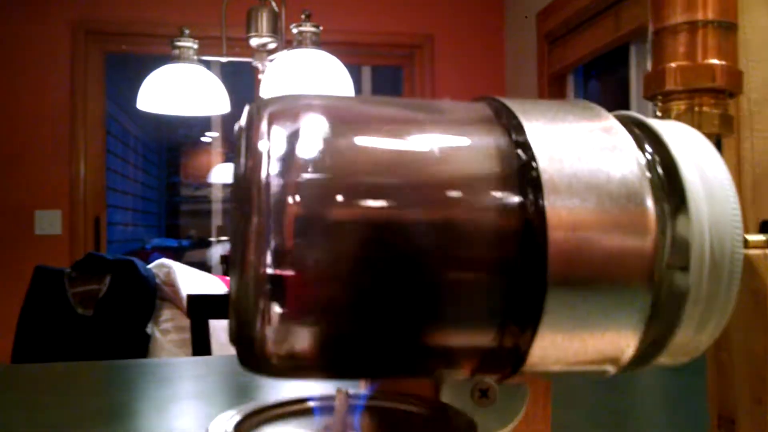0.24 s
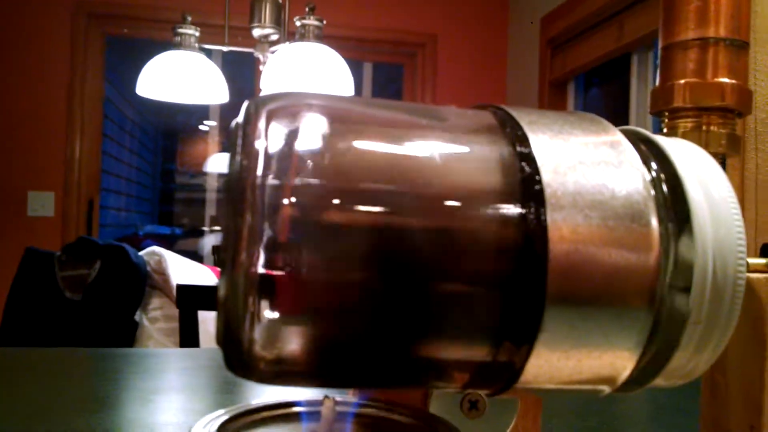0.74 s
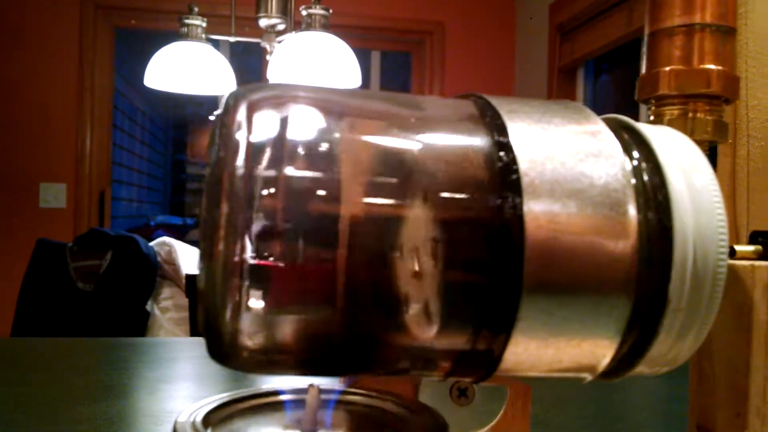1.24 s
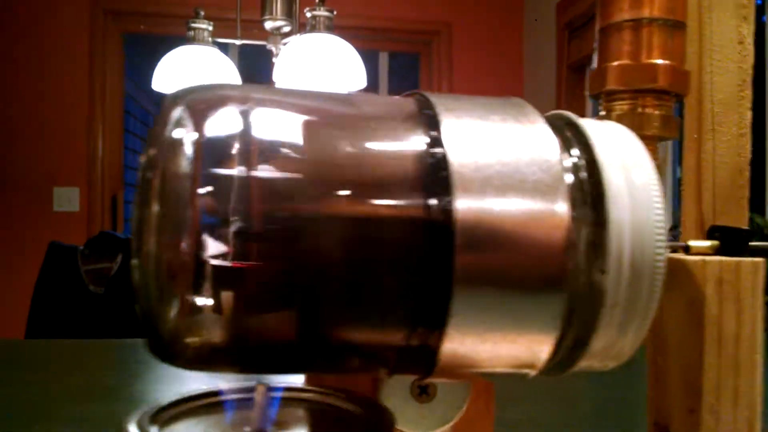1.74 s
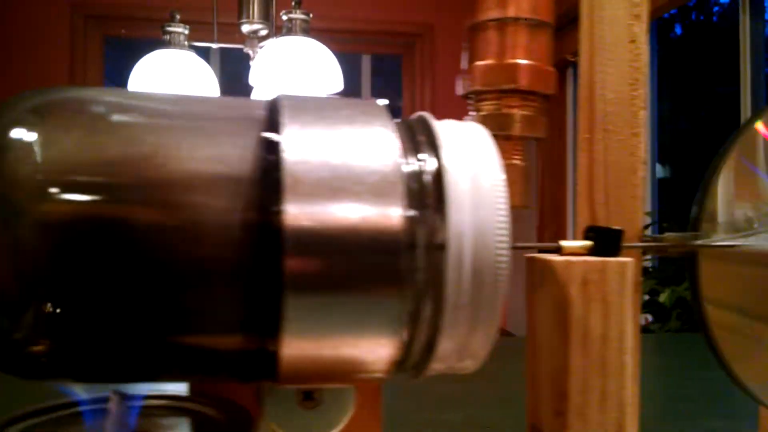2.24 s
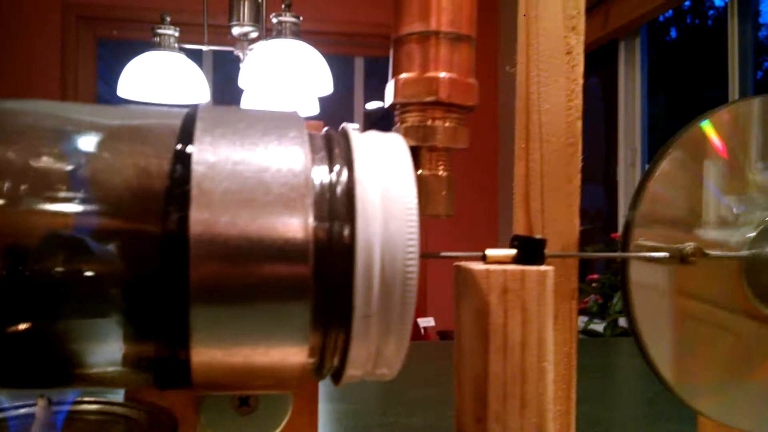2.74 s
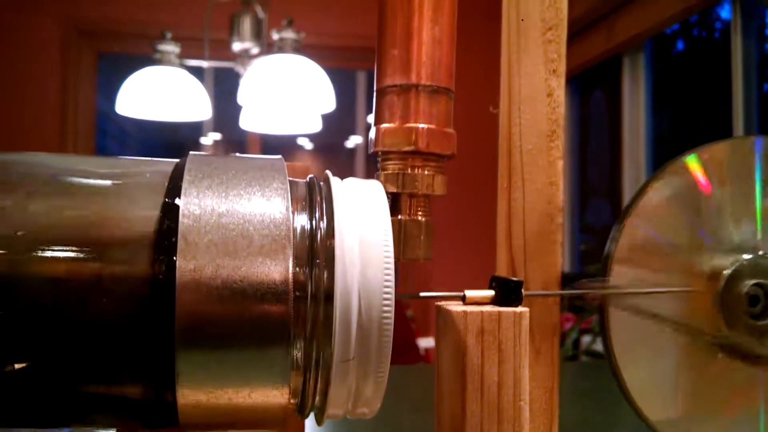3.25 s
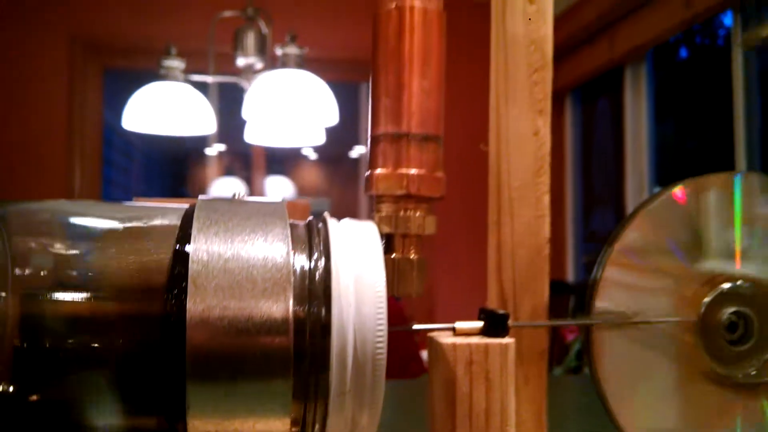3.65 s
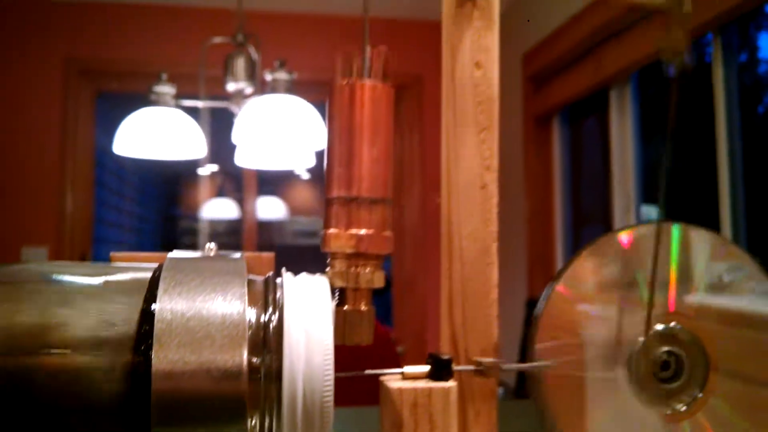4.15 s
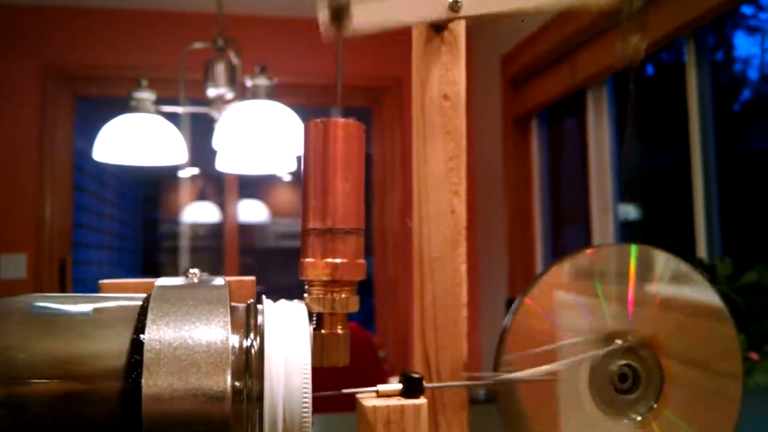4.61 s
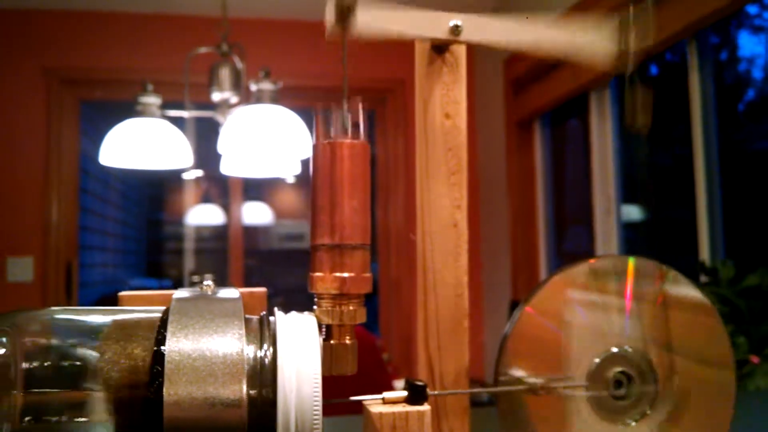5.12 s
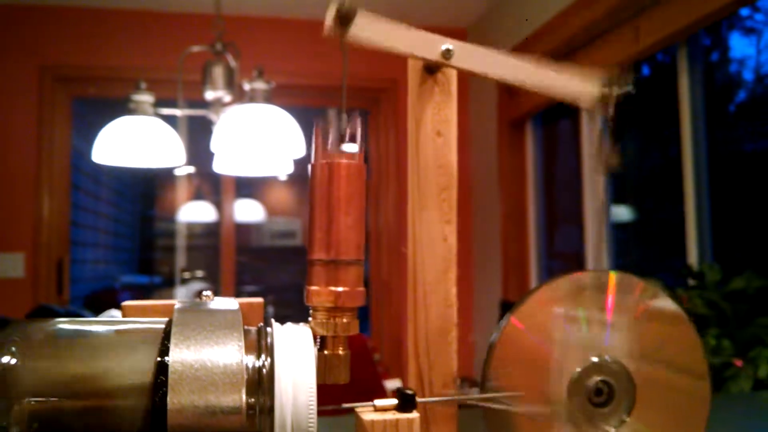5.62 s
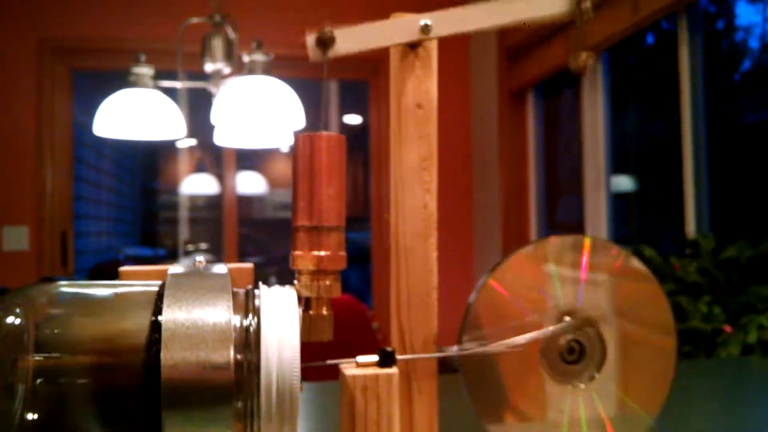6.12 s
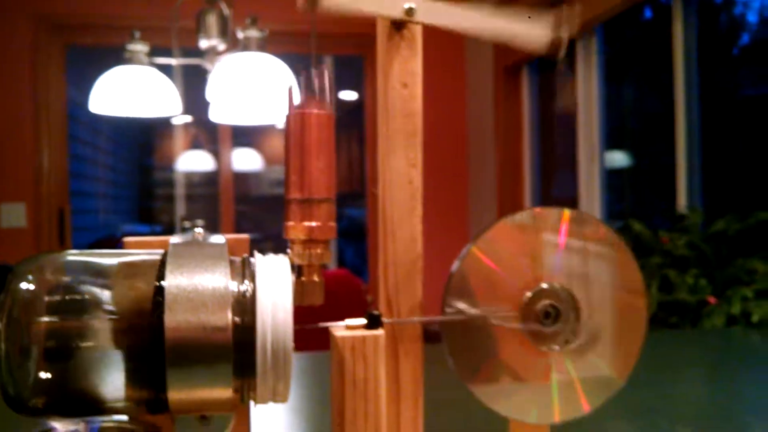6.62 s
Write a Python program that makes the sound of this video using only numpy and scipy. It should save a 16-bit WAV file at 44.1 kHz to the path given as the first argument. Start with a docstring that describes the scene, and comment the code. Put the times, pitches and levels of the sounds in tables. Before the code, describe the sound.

Fast mechanical chatter at under five turns a second: a clustered clatter alternating with a crisp knock, like a tiny loose sewing machine. Thin wire rods tap and rub, bearings tick faintly, and wood and glass answer dully. A few hollow clunks come around the middle. Knocks vary in strength, some cracking harder near the end. Heard very close in stereo, in a quiet room with a light, short echo.

```python
"""Hot-air engine on a table

A homemade hot-air engine of glass jar, wire rods and wooden beam runs at about 4.65 turns a second.
Slack linkage clatters at one end of each stroke and knocks at the other, with light taps and ticks between:
each contact is a burst of shaped noise, while frame, jar, board and table are resonators struck by clicks.
Hiss, low room noise, a swelling drone and diffuse echoes surround it; a close microphone pair picks it up."""
import sys
import numpy as np
from scipy import signal
from scipy.fft import rfft, irfft, next_fast_len
from scipy.io import wavfile

SR = 44100
rng = np.random.default_rng(int(sys.argv[2]) if len(sys.argv) > 2 else 0)


def waveform_to_disk(signal):
    """Save audio, clipped to [-1, 1], as 16-bit WAV at the path in sys.argv[1]."""
    frames = np.transpose(np.atleast_2d(signal))
    scaled = np.clip(frames, -1, 1) * 32767
    samples = np.round(scaled).astype(np.int16)
    wavfile.write(sys.argv[1], SR, samples)


N = 302958

# All levels in the tables are relative.
# Background, dropping at the start and then rising slowly. Each row: time in seconds, hiss level in dB,
# low room noise level in dB.
BED = [(0.0, -43, -37), (0.19, -49, -45.5), (6.87, -41, -45)]
# Spectrum of the hiss. Each row: frequency in Hz, density in dB.
HISS_TONE = [(1500, 3), (2400, -10), (3300, 18), (5000, 15.5), (7000, 10), (9000, 17), (11000, 1),
             (13000, 15.5), (15000, 9)]
# Spectrum of the low room noise. Each row: frequency in Hz, density in dB.
ROOM_TONE = [(22, -1), (48, -20), (80, 6.5), (140, -3.5), (229, 0.5), (330, 5), (520, -3.5), (738, -1.5),
             (1020, -26), (2000, -13), (3500, -57)]
# Soft bumps of the hand that holds the microphones. Each row: centre in seconds, level in dB, half length in s.
HAND_BUMPS = [(0.75, -65, .06), (1.35, -56, .04), (2.01, -51.5, .07), (2.55, -54.5, .04), (3.22, -59, .08)]
# Low drone that swells as the engine runs on. Each row: time in seconds, level in dB.
DRONE = [(0.0, -61.5), (3.48, -55.5), (6.87, -49.5)]
# Modes of the table top. Each row: frequency in Hz, bandwidth in Hz, level in dB.
TABLE_MODES = [(84.8, 10.3, -49), (105, 19, -50), (141.2, 3.9, -54.5), (192.6, 27, -47.5)]
# Shoves of the moving masses in every turn. Each row: delay from the turn's start in seconds, level in dB.
SHOVES = [(.009, -10), (0.021, 1), (0.09, -1.5), (0.136, -0.5)]
# Flywheel motion, with slight changes of pace. Each row: time in seconds, turns made.
FLYWHEEL = [(0, 0), (.54, 2.51), (.651, 3), (1.09, 5), (1.741, 8), (2.815, 13), (4.088, 19), (4.96, 23),
            (5.383, 25), (6.873, 32)]
# Delay of the return stroke. Each row: time in seconds, lag in seconds.
RETURN_LAG = [(0, -0.005), (.8, 0.0018), (2, -0.0026), (3.8, -0.0013), (4.2, 0.00085), (4.7, .003),
              (5.1, -0.0018), (6.87, -0.0011)]
# How hard the rod taps and the displacer sways. Each row: time in seconds, upper part in dB, lower part in dB.
EFFORT = [(0, -5, -2), (1.1, -5, -4), (2.1, -3, 1), (2.9, -1.5, 1.5), (3.5, -3, -2), (4.0, -2.5, 5),
          (4.5, -3.5, -5), (5.5, -3, -0.5), (6.1, -1, 3.5), (6.87, -2, 0.5)]
# Spectrum of the rod rubbing through its bush. Each row: frequency in Hz, density in dB.
RUB_TONE = [(250, -10), (520, 3), (720, -6), (1020, -3), (1400, 7), (2400, -2.5), (3300, 8.5), (6000, -3.5),
            (15000, -36)]
# Spectrum of the stray bearing ticks. Each row: frequency in Hz, density in dB.
GRIT_TONE = [(2400, -14), (3300, 8), (6000, 5), (14000, -26)]
# Displacer swaying against the jar. Each row: place in turns, jar level in dB, board level in dB.
SWAYS = [(.033, -47, -40), (.352, -44.5, -67), (.412, -47, -51), (.54, -74, -37.5), (.592, -57, -42.5),
         (.652, -44, -55.5), (.732, -42.5, -60)]
# Heavier blows on the whole jar. Each row: start in seconds, jar level in dB, board level in dB.
JOLTS = [(3.182, -35.5, -50), (3.819, -41, -47), (3.9837, -30, -36)]
# Modes of the jar's hollow. Each row: frequency in Hz, bandwidth in Hz, level in dB.
JAR_MODES = [(616, 80, -4), (662, 38, 0), (741, 69, 1), (810, 63, 2.5)]
# Modes of the base board. Each row: frequency in Hz, bandwidth in Hz, level in dB.
BOARD_MODES = [(281, 31, -5), (385.6, 48, 3.5)]
# Modes of the wooden frame. Each row: frequency in Hz, bandwidth in Hz, level in dB.
FRAME_MODES = [(293, 65, -3), (342, 59, 1.5), (415, 98.5, 2.5), (700, 110, 1), (764, 87, 2.5),
               (1360, 103, 5), (1560, 480, 3.5), (1912, 120, 1)]
# Pin snapping across its hole, mostly just before the knock. Each row: start in seconds, click level in dB.
TICKS = [(0.094, -29), (0.104, -23.5), (0.3127, -20), (0.751, -28), (0.971, -30), (1.1898, -31),
         (1.334, -36), (1.4056, -35), (1.6236, -36), (1.837, -34), (2.478, -26.5), (2.697, -32.0),
         (2.9075, -28), (3.1226, -19.5), (3.3343, -17), (3.5472, -28), (3.7596, -21), (3.9733, -23),
         (4.1886, -19), (4.621, -27.5), (4.8392, -23), (5.055, -25), (5.2685, -33), (5.483, -23),
         (5.6942, -19), (5.907, -18), (6.1206, -25), (6.127, -22), (6.3336, -20), (6.545, -20.5),
         (6.7572, -28)]
# Spectrum of the pin. Each row: frequency in Hz, density in dB.
TICK_TONE = [(500, -22), (1000, -22), (1500, -10), (2400, 2), (3200, -8.5), (4300, 1.5), (5500, -2),
             (6700, -3.5), (7700, 7.5), (8600, -1), (10000, -11), (11300, -2.5), (12800, -10), (15000, -7)]
# Wire rod in its guide, before and after the knock. Each row: place in turns, click in dB, frame thud in dB.
TAPS = [(.358, -23, -39.5), (.383, -29, -48.5), (.415, -38, -48), (.729, -25.5, -56)]
# Spectrum of the wire rod. Each row: frequency in Hz, density in dB.
TAP_TONE = [(300, -6), (1000, -4), (1600, -2.5), (2400, -0.5), (3150, 9), (4000, -7), (5000, 5),
            (7000, -6.5), (8600, 2), (9600, 0), (11200, -2.5), (13000, 5), (15000, -11)]
# Linkage hitting home half a turn after the clatter. Each row: start in seconds, click in dB, frame thud in dB.
KNOCKS = [(0.1074, -26, -34), (0.3236, -21.5, -37.5), (0.54, -18, -41), (0.7575, -15, -35.5),
          (0.9831, -20, -41), (1.2015, -17, -36.5), (1.4183, -15.5, -37), (1.6359, -17, -35),
          (1.8525, -17.5, -32), (2.0664, -18.5, -36), (2.2833, -16, -34.5), (2.4953, -16.5, -31.5),
          (2.71, -13.5, -32), (2.9247, -12, -27.5), (3.1373, -15, -30), (3.3485, -21, -34.5),
          (3.5611, -19.5, -31.5), (3.774, -21, -31.5), (3.9828, -9.5, -29.5), (4.2011, -15.5, -35),
          (4.4197, -17.5, -33.5), (4.637, -16.5, -32.5), (4.852, -13.5, -36.5), (5.067, -9.5, -31),
          (5.2824, -14, -36.5), (5.4943, -19, -31.5), (5.7075, -21, -31.5), (5.919, -7.5, -34),
          (6.1338, -17.5, -29.5), (6.3452, -7, -32), (6.5579, -20, -28), (6.7699, -16, -35.5)]
# Spectrum of the knock. Each row: frequency in Hz, density in dB.
KNOCK_TONE = [(500, -10.5), (1000, -38), (1500, -5), (2400, -19), (3200, -9), (4300, -4.5), (5500, -2),
              (6700, -8), (7700, 1.5), (8600, -7.5), (10000, 3.5), (11300, -1.5), (12800, -0.5),
              (15000, -5)]
# Spectrum of the bounce after the knock. Each row: frequency in Hz, density in dB.
BOUNCE_TONE = [(500, -13.5), (1000, -30), (1500, -18), (2400, 1.5), (3200, -1), (4300, -10), (5500, -12),
               (6700, -2.5), (7700, -3), (8600, -8), (10000, -22), (11300, -11), (12800, -4.5),
               (15000, -5.5)]
# Crank slack taken up in three steps as each turn begins. Each row: start in seconds, first click in dB,
# second click in dB, delay of the last click in seconds, last click in dB, frame thud in dB.
CLATTER = [(0.0012, -31, -19, 0.0093, -27, -43), (0.2151, -25.5, -25, 0.014, -21, -37.5),
           (0.4322, -29.5, -36, 0.014, -29, -41), (0.652, -28, -27, 0.013, -26.5, -38),
           (0.8704, -29, -22, 0.013, -21, -34), (1.0896, -28.5, -28.5, 0.0133, -23.5, -39),
           (1.3069, -26.5, -25.5, 0.015, -26.5, -37), (1.5261, -24.5, -25.5, 0.012, -28.5, -38),
           (1.7414, -26, -30, 0.013, -33, -41), (1.9544, -28, -28, 0.017, -20.5, -37),
           (2.17, -26.5, -38, 0.012, -31.5, -43.5), (2.384, -22.5, -31, 0.013, -31, -49),
           (2.5994, -21, -28, 0.0136, -22, -36), (2.816, -24.5, -35, 0.013, -31, -37.5),
           (3.028, -25, -26.5, 0.015, -26, -35.5), (3.2373, -26, -28, 0.017, -28.0, -35.5),
           (3.4491, -29.5, -34, 0.014, -24, -37.5), (3.6614, -26.0, -25, 0.014, -32, -38.5),
           (3.8749, -23, -23, 0.014, -19, -37), (4.0889, -23.5, -27, 0.014, -16.5, -34),
           (4.3051, -29.5, -23.5, 0.013, -29, -36), (4.525, -23.5, -25, 0.0119, -28, -34),
           (4.7415, -24.5, -18.5, 0.014, -15.5, -36), (4.957, -27, -23.5, 0.0134, -29.5, -35.5),
           (5.1705, -23.5, -24, 0.013, -22.5, -35.5), (5.3835, -28, -32, 0.012, -29, -43.5),
           (5.5947, -26, -26.5, 0.016, -20, -40.5), (5.8081, -19, -27, 0.016, -18, -35),
           (6.021, -26, -23, 0.014, -19, -36), (6.2322, -22.5, -22, 0.0147, -15.5, -33),
           (6.446, -24, -22, 0.015, -22, -38.5), (6.659, -23, -10.5, 0.014, -23, -33.5)]
# Spectrum of the nudge before the first click. Each row: frequency in Hz, density in dB.
NUDGE_TONE = [(700, -18), (1300, -9), (2200, 2), (3200, 3), (9000, -30)]
# Spectrum of the first click. Each row: frequency in Hz, density in dB.
CLATTER_TONE = [(500, -10.5), (1000, -15), (1500, -10), (2400, 2.5), (3200, -9), (4300, -9.5), (5500, -8.5),
                (6700, -3), (7700, 0), (8600, -6.5), (10000, -0.5), (11300, -1.5), (12800, 0.5),
                (15000, -7)]
# Spectrum of the later clacks as the crank seats. Each row: frequency in Hz, density in dB.
SEAT_TONE = [(500, -21), (1000, -9), (1500, -5.5), (2400, -7.5), (3200, -1.5), (4300, -1.5), (5500, 1.5),
             (6700, -6.5), (7700, 2.5), (8600, -5), (10000, -2), (11300, -5.5), (12800, -6), (15000, -5)]
# How unlike the noise is at the two microphones, as a gain on side over mid. Each row: frequency in Hz, gain in dB.
UNLIKE = [(100, -1), (330, 1), (1000, -7), (2100, 10.5), (3200, 10.5), (5800, 5), (7500, -2), (15000, 11)]
# Gain on the difference between the microphones. Each row: frequency in Hz, gain in dB.
WIDTH = [(300, 2), (1200, -1), (2600, -2.5), (9000, -2.3), (13000, 0)]
# Right microphone over left. Each row: frequency in Hz, gain in dB.
RIGHT_GAIN = [(80, -2), (150, 4.5), (330, 4.5), (700, 1.5), (1300, -0.6), (2600, 1), (4000, 1.5),
              (8000, 2.5), (11500, 1), (15000, 0)]
# Colour of both microphones. Each row: frequency in Hz, gain in dB.
MIC_TONE = [(6800, 0), (7400, 1), (8500, 0), (9200, -2.5), (10100, 4), (12700, -1), (14900, 3.5)]

TIME = np.arange(N) / SR
PADDED = next_fast_len(N + SR // 2)
BINS = np.arange(PADDED // 2 + 1) * SR / PADDED  # Hz
# The return lag applies to places beyond this one, in turns.
RETURN_FROM = .63
# Lead of the nudge before the first click, delay of the second click, delay of the bounce after the knock (s).
NUDGE_S, SECOND_STEP_S, BOUNCE_S = 0.00326, .0057, .006
# Tiny touches within one contact (per s); its edge comes a little before its loudest moment (s).
TOUCHES_PER_S, LEAD_S = 1700, .0005
# Metal modes below this frequency (Hz) ring longer by this factor.
SLOW_MODES_HZ, LINGER = 4300, 2.66
# Harder blows are brighter: the swing in level grows as (Hz / RAP_HZ) ** RAP_POWER.
RAP_HZ, RAP_POWER = 1400, 0.36
# Near sound is in phase below SPLIT_HZ; above, its mono sum cancels at every multiple of COMB_HZ.
COMB_HZ, SPLIT_HZ = 2565, 1650
CUTOFF_HZ = 15500
HEADROOM = .75  # height at which loud cracks are rounded off


def from_db(db):
    """Logarithmic scale: decibels become an amplitude gain."""
    return 10 ** (np.asarray(db) / 20)


def rms_one(x):
    """Normalization: scale to unit power."""
    return x / np.sqrt(np.mean(x ** 2) + 1e-20)


def in_time(rows):
    """Linear interpolation: each column of a time curve at every sample."""
    s, *columns = np.transpose(rows)
    return [np.interp(TIME, s, c) for c in columns]


def gain_curve(points):
    """Frequency response: (Hz, dB) points become a gain at every bin, over log frequency."""
    hz, db = np.transpose(points)
    return from_db(np.interp(np.log(BINS + 1), np.log(hz), db))


def filtered(x, response):
    """Convolution theorem: multiply the spectrum by a frequency response."""
    return irfft(rfft(x, PADDED) * response, PADDED)[..., :N]


def pair(apart, size):
    """Partial coherence: white noise at two microphones, with a typical side-to-mid ratio of apart."""
    mid, side = rfft(rng.standard_normal((2, size)))
    hz = np.arange(len(mid)) * SR / size
    ratio = apart * from_db(np.interp(hz, *np.transpose(UNLIKE)))
    left_right = mid + ratio * side * np.array([[1], [-1]])
    return irfft(left_right / np.sqrt(1 + ratio ** 2), size)


def noise(tone, apart):
    """Spectral shaping: stereo noise of a given colour, falling away below its first point."""
    low_cut = 1 / np.sqrt(1 + (tone[0][0] / (BINS + 1)) ** 6)
    return rms_one(filtered(pair(apart, N), gain_curve(tone) * low_cut))


def clicks(times, sizes):
    """Impulse excitation: a train of single-sample clicks."""
    out, at = np.zeros(N), np.round(times * SR).astype(int)
    inside = (at >= 0) & (at < N)
    np.add.at(out, at[inside], sizes[inside])
    return out


def ring(x, hz, width):
    """Damped resonance: a unit click sets a decaying sine of height 1 ringing."""
    r = np.exp(-np.pi * abs(width) / SR)
    w = 2 * np.pi * hz / SR
    return signal.lfilter([0, np.sin(w)], [1, -2 * r * np.cos(w), r * r], x + 1e-18)


def body(modes, times, thud_db, scatter_db, spread_s):
    """Modal excitation: each blow rings every mode, delayed at random and uneven between microphones."""
    chance = rng.standard_normal((len(times), len(modes), 3))
    late = spread_s * rng.random((len(times), len(modes)))
    usual_db, out = np.mean(thud_db), np.zeros((2, N))
    for k, (hz, width, db) in enumerate(modes):
        strength, sign, lean = chance[:, k].T
        blow_db = usual_db + (thud_db - usual_db) * (hz / RAP_HZ) ** RAP_POWER
        sizes = from_db(blow_db + db + scatter_db * strength) * np.sign(sign)
        strikes = [clicks(times + late[:, k], sizes * (1 + side * lean)) for side in (-.15, .15)]
        out += ring(np.array(strikes), hz, width)
    return out


def thuds(s, thud_db):
    """Structure-borne sound: blows excite the modes of the wooden frame."""
    return body(FRAME_MODES, s, thud_db - 3.5, scatter_db=1.0, spread_s=0.00299)


def contacts(s, levels_db, tone, rise_s, fall_s, sharpen, apart, colour_db, ragged_db):
    """Impact noise: a ragged run of touches sets small metal modes sizzling for a few ms.

    A positive sharpen makes harder contacts shorter."""
    size, early = 2048, 512
    t, hz = (np.arange(size) - early) / SR, np.arange(size // 2 + 1) * SR / size
    colour = np.interp(hz, BINS, gain_curve(tone)) * hz / np.hypot(hz, 300)
    is_low = 1 / (1 + (hz / SLOW_MODES_HZ) ** 4)
    # exponents of the rise and fall, zero at the edge
    strike = np.minimum(t / rise_s, -t / fall_s)
    slow_strike = np.minimum(t / rise_s, -t / (fall_s * LINGER))
    # the parts graze each other before they meet squarely
    graze = 0.057 * np.exp(-(t / 0.0059) ** 2)
    out = np.zeros((2, N + 2 * size))
    for when, db in zip(s, levels_db):
        # no two blows land alike: each favours other modes
        favour = rng.standard_normal(size=32)
        favour_curve = np.interp(np.sqrt(hz / hz[-1]), np.linspace(0, 1, len(favour)), favour)
        ripple = from_db(colour_db * favour_curve)
        sizzle = rms_one(irfft(rfft(pair(apart, size)) * colour * ripple))
        low = irfft(rfft(sizzle) * is_low)
        length = from_db(-sharpen * (db - np.mean(levels_db)))
        quick = (sizzle - low) * np.exp(strike / length)
        slow = 1.082 * low * np.exp(slow_strike / length) / np.sqrt(LINGER)
        touches = np.interp((t - t[0]) * TOUCHES_PER_S, np.arange(size), rng.uniform(-0.88, 1, size))
        ragged = rms_one(from_db(ragged_db * touches))
        at = int(np.clip((when - LEAD_S) * SR, 0, N))
        out[:, at:at + size] += from_db(db) * (quick + slow + graze * sizzle) * ragged
    return out[:, early:early + N]


def crank_times(places):
    """Rotational kinematics: when the crank passes the given places, one row for each turn."""
    s, turns = np.transpose(FLYWHEEL)
    return np.interp(np.arange(turns[-1])[:, None] + places, turns, s)


def turn_starts():
    """Periodicity: when each turn of the flywheel begins."""
    return crank_times(np.zeros(1)).ravel()


def each_turn(pattern, wander_s, scatter_db, follows):
    """Imperfect periodicity: a round of contacts varies with effort and chance; gives (s, upper dB, lower dB)."""
    places, upper_db, lower_db = np.transpose(pattern)
    s = crank_times(places)
    s = s + np.interp(s, *np.transpose(RETURN_LAG)) * (places > RETURN_FROM)
    late, upper_luck, lower_luck = rng.standard_normal((3, *s.shape))
    effort_s, upper_effort, lower_effort = np.transpose(EFFORT)
    upper_db = upper_db + follows * np.interp(s, effort_s, upper_effort) + scatter_db * upper_luck
    lower_db = lower_db + np.interp(s, effort_s, lower_effort) + scatter_db * lower_luck
    return [c.ravel() for c in (s + wander_s * late, upper_db, lower_db)]


def hiss(swing_db, loudest):
    """Amplitude modulation: hiss swells and sinks a little with each turn (loudest, in turns)."""
    hiss_db, _ = in_time(BED)
    turns, = in_time(FLYWHEEL)
    swing = swing_db * np.cos(2 * np.pi * (turns - loudest))
    return from_db(hiss_db - 5.5 + swing) * noise(HISS_TONE, apart=0.64)


def room_noise():
    """Coloured noise: the low noise of the room, at a level that drops quickly at first, then drifts."""
    _, room_db = in_time(BED)
    return from_db(room_db - 7.0) * noise(ROOM_TONE, apart=0.68)


def hand_bumps():
    """Handling noise: smooth swells of very low noise from the hand that holds the microphones."""
    grip = sum(from_db(db) * np.exp(-((TIME - s) / length) ** 2) for s, db, length in HAND_BUMPS)
    return grip * noise([(20, -10), (36, -14), (80, -28), (300, -45)], apart=0.6)


def room(x, low_t60, high_t60, split_hz, build_s):
    """Reverberation: diffuse reflections build up, then bass and treble decay at separate rates."""
    t = TIME[:SR // 2]
    low_pass = signal.butter(2, split_hz, fs=SR, output="sos")
    high_pass = signal.butter(2, split_hz, "high", fs=SR, output="sos")
    low = signal.sosfilt(low_pass, pair(0.027, len(t))) * from_db(-60 * t / low_t60)
    high = signal.sosfilt(high_pass, pair(0.11, len(t))) * from_db(-60 * t / high_t60)
    tail = (from_db(6.5) * low + high) * (1 - np.exp(-t / build_s))
    return filtered(x, rfft(tail / np.sqrt(np.sum(tail ** 2) / 2), PADDED))


def table(scatter_db, jitter_s):
    """Forced vibration: shoves in every turn rock the table top and keep a low mode droning."""
    delay, shove_db = np.transpose(SHOVES)
    starts = turn_starts()
    chance = rng.standard_normal((len(starts), 2, len(SHOVES)))
    times = starts[:, None] + delay + jitter_s * chance[:, 0]
    sizes = from_db(shove_db + scatter_db * chance[:, 1])
    push = clicks(times.ravel(), sizes.ravel())
    rocking = sum(from_db(db) * ring(push, hz, width) for hz, width, db in TABLE_MODES)
    drone = rms_one(ring(push, hz=144.5, width=8))
    return rocking + from_db(in_time(DRONE)[0] - 3.5) * drone


def rubbing(fastest, depth_db, catches_per_s, rough_db):
    """Sliding friction: the rod rubs loudest at one point of the turn (fastest, in turns), catching unevenly."""
    turns, = in_time(FLYWHEEL)
    swing_db = depth_db * np.cos(2 * np.pi * (turns - fastest))
    catches = np.clip(rng.standard_normal(N), -2, 2)
    catch_db = rough_db * np.interp(TIME * catches_per_s, np.arange(N), catches)
    # the rubbing follows the hiss level
    return from_db(in_time(BED)[0] - 16.5 + swing_db + catch_db) * noise(RUB_TONE, apart=0.083)


def grit(level_db, spread_db, count=240):
    """Dry friction: faint stray ticks and scrapes from the bearings at random times, no two of one colour."""
    s, size = rng.random((count, 2)).T
    s = s * N / SR
    # they follow the hiss level
    db = level_db + spread_db * np.minimum(-np.log(size), 3) + np.interp(s, *np.transpose(BED)[:2])
    return contacts(s, db, GRIT_TONE, rise_s=0.00047, fall_s=0.0013, sharpen=.1,
                    apart=0.2, colour_db=3.0, ragged_db=1)


def sways():
    """Coupled resonators: the displacer bumps hollowly inside the jar and rocks the base board."""
    s, jar_db, board_db = each_turn(SWAYS, wander_s=0.00083, scatter_db=3.0, follows=0.34)
    jar = body(JAR_MODES, s, jar_db, scatter_db=3.0, spread_s=0.00612)
    return jar + body(BOARD_MODES, s, board_db, scatter_db=1.0, spread_s=0.0029)


def jolts():
    """Impulse response: a square blow starts all modes of jar and board at once, a hollow clunk."""
    s, jar_db, board_db = np.transpose(JOLTS)
    return sum(ring(clicks(s, from_db(blow_db + db - 2.5)), hz, width)
               for modes, blow_db in ((JAR_MODES, jar_db), (BOARD_MODES, board_db))
               for hz, width, db in modes)


def pin_ticks():
    """Impact across a clearance: the pin snaps from one side of its hole to the other."""
    s, snap_db = np.transpose(TICKS)
    return contacts(s, snap_db + 2.5, TICK_TONE, rise_s=0.00029, fall_s=0.0026, sharpen=0.16,
                    apart=0.56, colour_db=4, ragged_db=3)


def rod_taps():
    """Repeated light impact: the wire rod taps and rattles in its guide. Gives (metal, wood)."""
    s, click_db, thud_db = each_turn(TAPS, wander_s=.001, scatter_db=2.0, follows=2.25)
    rod = contacts(s, click_db + 4.5, TAP_TONE, rise_s=0.0012, fall_s=0.0035, sharpen=0.05,
                   apart=0.34, colour_db=3.5, ragged_db=8.0)
    return rod, thuds(s, thud_db)


def knock():
    """Impact and rebound: the linkage cracks home and falls back with a duller bounce. Gives (metal, wood)."""
    s, click_db, thud_db = np.transpose(KNOCKS)
    again = s + BOUNCE_S + .0006 * rng.standard_normal(len(s))
    crack = contacts(s, click_db + 1.5, KNOCK_TONE, rise_s=0.00038, fall_s=0.002, sharpen=0.54,
                     apart=0.35, colour_db=-0.5, ragged_db=2.0)
    bounce = contacts(again, thud_db + 12, BOUNCE_TONE, rise_s=0.0017, fall_s=0.0031, sharpen=0.092,
                      apart=0.9, colour_db=0.0, ragged_db=2)
    return crack + bounce, thuds(np.r_[s, again], np.r_[thud_db - 4, thud_db + .3])


def clatter():
    """Backlash: slack gives a dull nudge, a bright click and two fuller clacks. Gives (metal, wood)."""
    s, first_db, second_db, delay, last_db, thud_db = np.transpose(CLATTER)
    seats = np.r_[s + SECOND_STEP_S, s + delay]
    nudge = contacts(s - NUDGE_S, thud_db + 7.0, NUDGE_TONE, rise_s=0.00025, fall_s=0.00068, sharpen=0,
                     apart=0.21, colour_db=-2.5, ragged_db=-3)
    first = contacts(s, first_db + 4.5, CLATTER_TONE, rise_s=0.0012, fall_s=0.002, sharpen=0.29,
                     apart=0.15, colour_db=2.5, ragged_db=-1)
    seated = contacts(seats, np.r_[second_db, last_db] + 3.0, SEAT_TONE, rise_s=0.00079, fall_s=0.0026,
                      sharpen=0.6, apart=0.52, colour_db=4.0, ragged_db=0.5)
    return nudge + first + seated, thuds(seats, np.r_[thud_db + .6, thud_db - 1.2])


def scene():
    """Superposition: the engine on its table and its echoes add to the background."""
    metal, wood = np.sum([clatter(), knock(), rod_taps()], axis=0)
    metal = metal + pin_ticks() + grit(level_db=5, spread_db=2.0)
    wood = wood + sways() + jolts()
    echo = room(from_db(-11.5) * metal + from_db(-11.0) * wood,
                low_t60=0.32, high_t60=0.46, split_hz=1680, build_s=0.0015)
    engine = metal + wood + echo + table(scatter_db=2.0, jitter_s=0.00093)
    engine = engine + rubbing(fastest=0.49, depth_db=14.5, catches_per_s=250, rough_db=8.0)
    # high-pass: remove the resonators' unwanted output at the lowest frequencies
    high_pass = signal.butter(6, 68, "high", fs=SR, output="sos")
    background = hiss(swing_db=1.0, loudest=0.21) + room_noise() + hand_bumps()
    return signal.sosfilt(high_pass, engine) + background


def record(dry):
    """Two-microphone interference: opposite lags comb the treble; peaks are rounded and the top is cut."""
    # mid and side become sound from the two sides of the pair
    near, far = rfft([dry[0] + dry[1], dry[0] - dry[1]], PADDED) / 2
    # half the phase lead of the right microphone, in radians
    onset = np.interp(BINS, [SPLIT_HZ, COMB_HZ], [0, 1])
    half_lead = np.pi / 2 * np.where(BINS < COMB_HZ, onset, 2 * BINS / COMB_HZ - 1)
    side = np.array([[-1], [1]])
    near_heard = near * np.exp(1j * side * half_lead)
    far_heard = far * np.exp(-1j * side * np.maximum(half_lead, np.pi / 2))
    heard = near_heard + far_heard
    middle = heard.mean(axis=0)
    heard = middle + (heard - middle) * gain_curve(WIDTH)
    balance = gain_curve(RIGHT_GAIN) ** (side / 2)
    picked_up = irfft(heard * balance * gain_curve(MIC_TONE), PADDED)[:, :N]
    rounded = HEADROOM * np.tanh(picked_up / HEADROOM)
    low_pass = 1 / np.sqrt(1 + (BINS / CUTOFF_HZ) ** 110)
    return filtered(rounded, low_pass)


dry = scene()
out = record(dry)
waveform_to_disk(out)
```